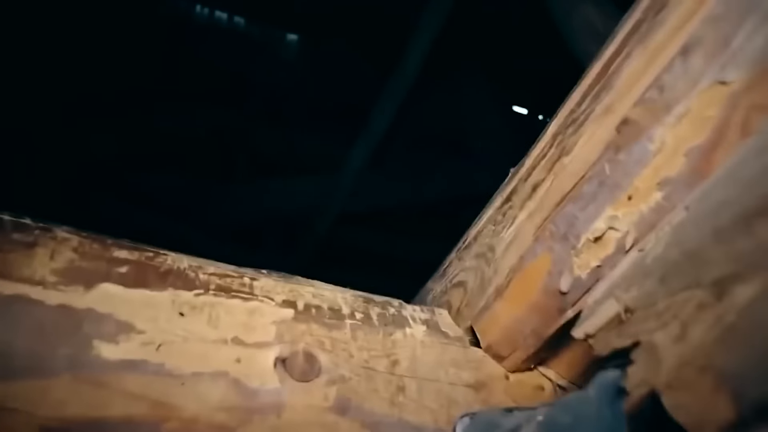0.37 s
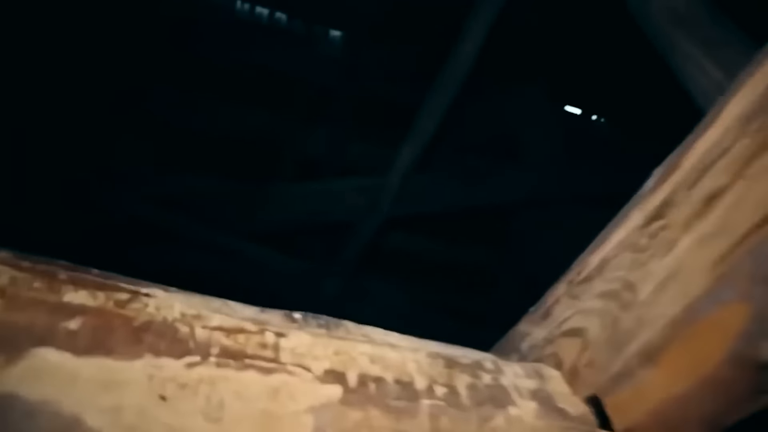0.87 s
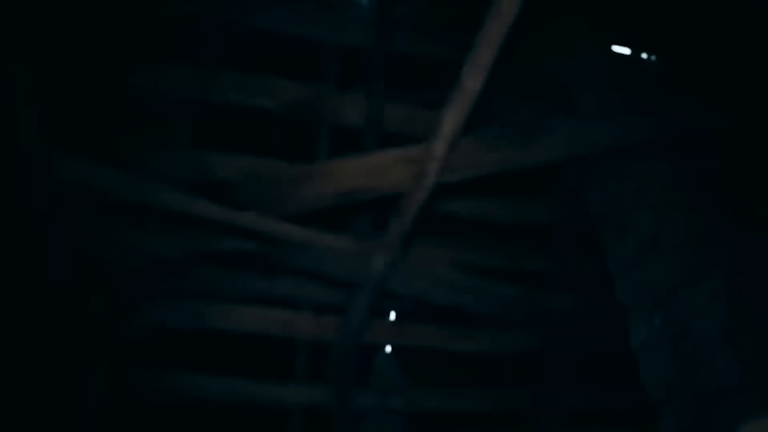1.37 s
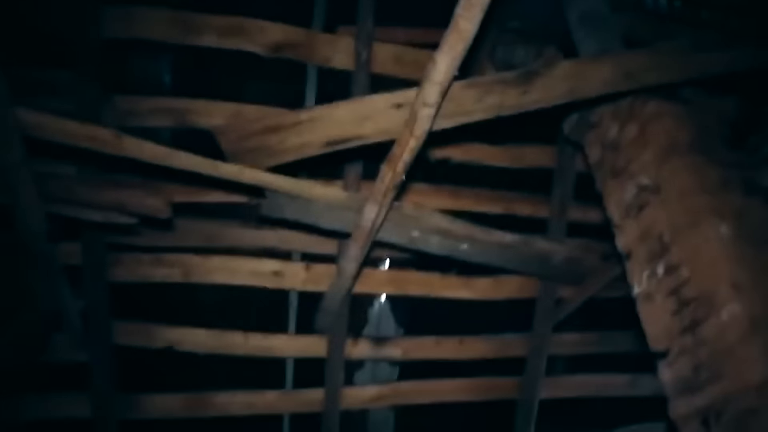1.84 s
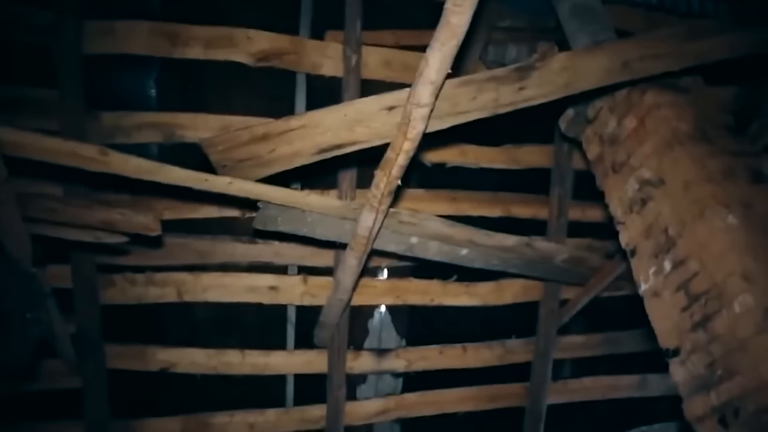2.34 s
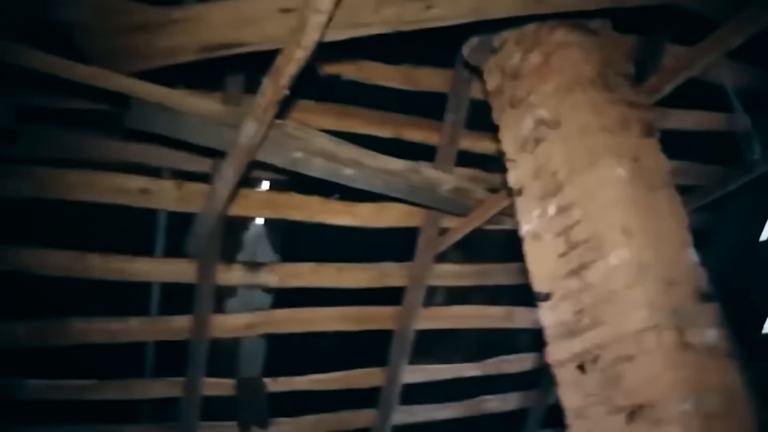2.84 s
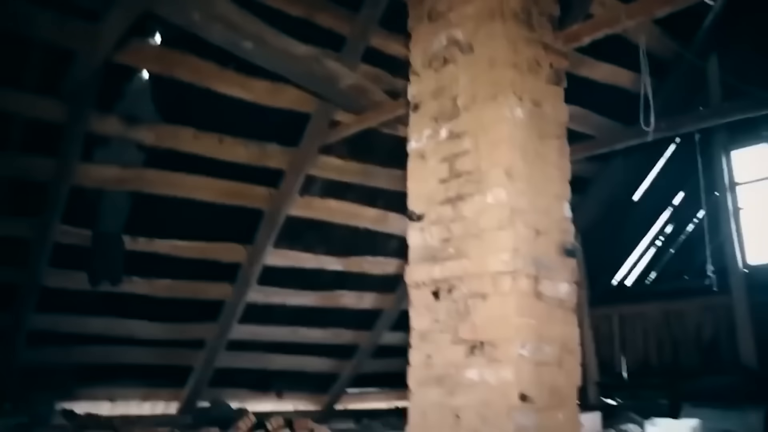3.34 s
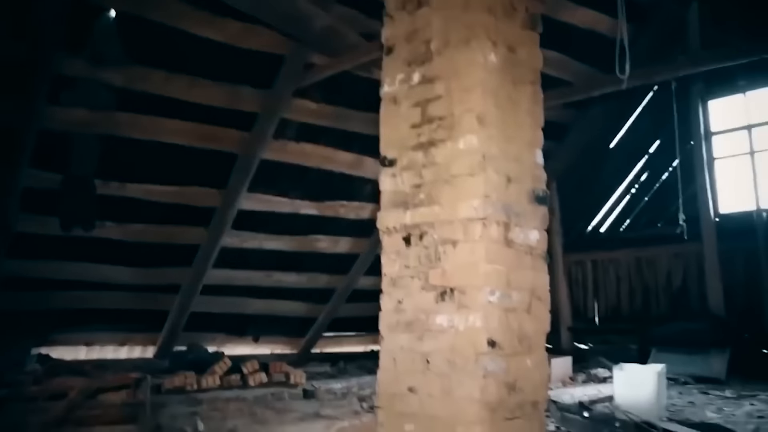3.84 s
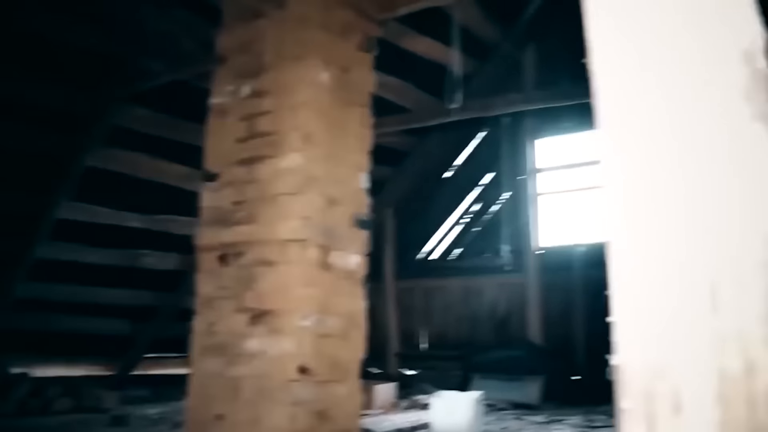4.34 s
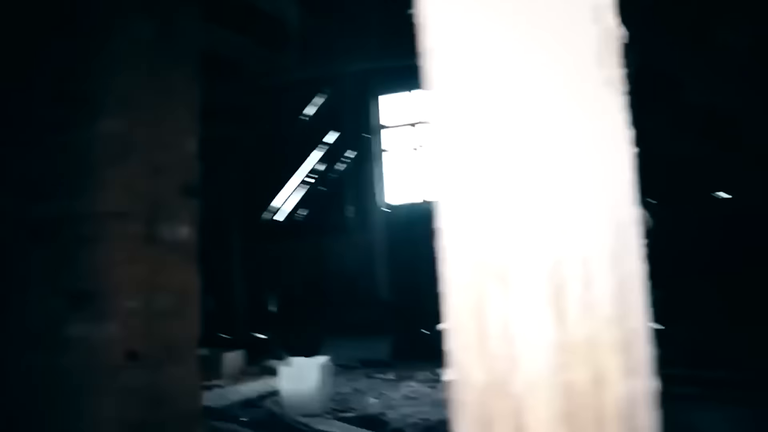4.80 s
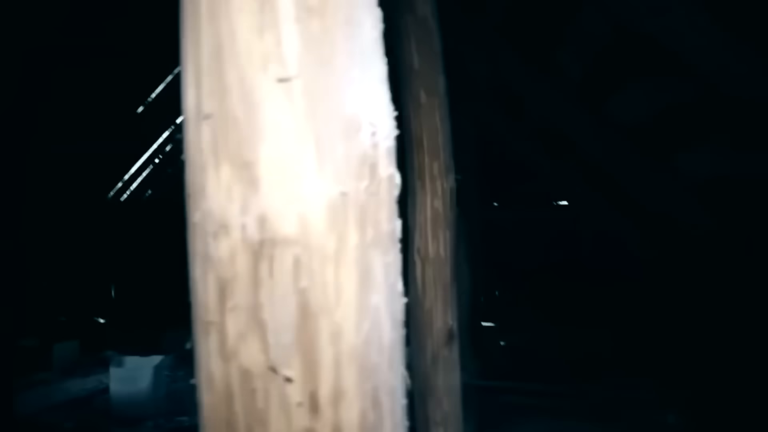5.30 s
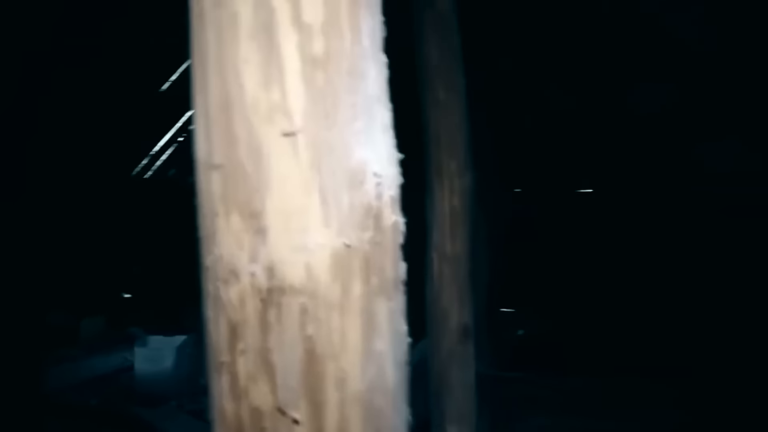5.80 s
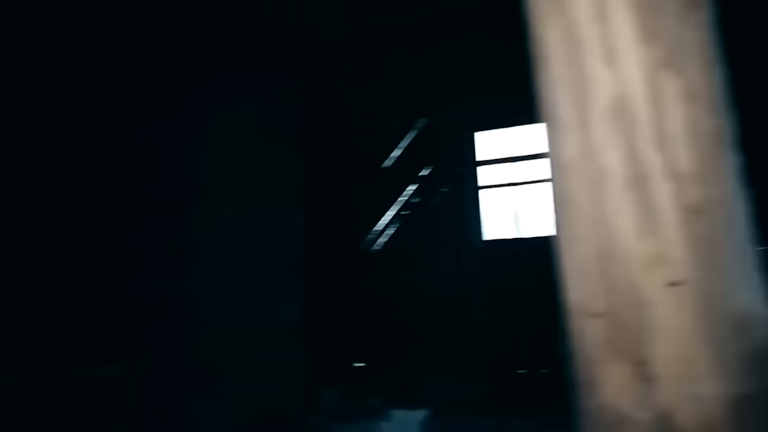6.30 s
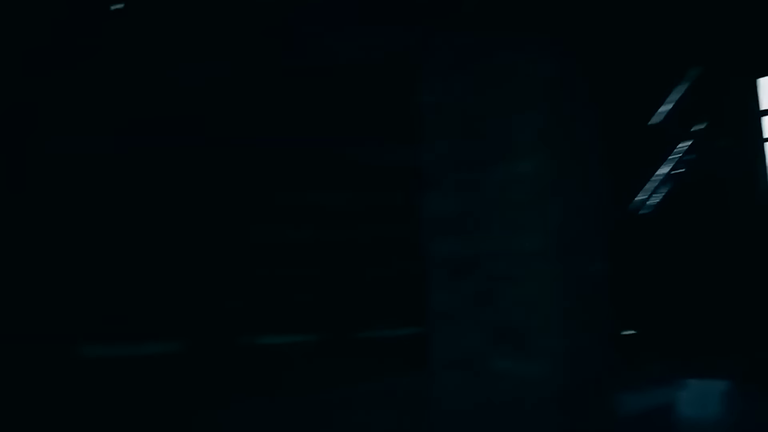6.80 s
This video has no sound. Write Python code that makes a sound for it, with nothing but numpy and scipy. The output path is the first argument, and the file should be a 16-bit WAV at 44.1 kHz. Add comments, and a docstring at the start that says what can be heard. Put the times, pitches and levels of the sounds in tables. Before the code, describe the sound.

Close stereo microphone carried by a walker in a dry wooden attic. Clothes rustle and bits of debris tick, then low hollow footsteps gather on loose boards, the loudest knock at about two seconds. A faint short shoe squeak follows, then sparse single steps, scuffs and tiny ticks. Finally a flurry of steps and rattling debris, with short roof echoes and faint hiss.

```python
"""A slow walk through a wooden attic, two-port microphone in hand: clothes rustle and debris ticks first.
Steps gather from 0.7 s as ringing boards over a booming floor beam; the loudest lands at 2.05 s.
A sole, a sliding narrow noise band, squeaks near 2.7 s; single steps follow, then scuffs (shaped noise)
and small ticks, and from 5.3 s a flurry of steps and debris. Boards murmur and grit crackles underfoot.
Throughout, a dry roof echoes the blows over faint noise of outdoor air and microphone hiss."""
import sys
import numpy as np
from scipy import signal
from scipy.fft import rfft, irfft
from scipy.io import wavfile
from scipy.ndimage import uniform_filter1d

SR = 44100
rng = np.random.default_rng(int(sys.argv[2]) if len(sys.argv) > 2 else 0)


def field_ratio(decibels):
    """Amplitude ratio for a level in dB (20 dB per decade); scalars and array-likes work."""
    return 10 ** (np.asarray(decibels, dtype=float) / 20)


def master(y):
    """Save y as 16-bit WAV."""
    cut = np.clip(np.atleast_2d(y).T, -1, 1)
    pcm = np.round(cut * 32767)  # scale
    wavfile.write(sys.argv[1], SR, pcm.astype(np.int16))


N = 305172
PORT_DELAY_S = 0.00013  # right port hears later


def evened(x):
    """Scales to rms 1."""
    return x / np.sqrt(np.mean(x ** 2) + 1e-20)


def read(points, hz):
    """Interpolates a curve on a log-frequency axis."""
    point_hz, value = np.transpose(points)
    return np.interp(np.log(hz + 1), np.log(point_hz + 1), value)


def add(mix, start_s, sound):
    """Mixes a sound in at start_s, cut at the end of the mix."""
    part = mix[..., round(start_s * SR):][..., :sound.shape[-1]]
    part += sound[..., :part.shape[-1]]


# Left-right likeness of the ports. Each row: frequency in Hz, correlation 0 to 1.
LIKENESS = [(30, 1), (60, 0.81), (125, 0.95), (250, 0.95), (500, 0.75), (1000, 0.66), (2000, 0.043),
            (16000, 0.033)]


def likeness(hz):
    """Long waves reach both ports alike, short ones differ."""
    return np.clip(read(LIKENESS, hz), -1, 1)


# Weight landing. Each row: listed time in seconds, board level in dB, board pitch in Hz,
# hardness (grit crack over board ring) in dB, beam boom over board level in dB.
STEPS = [(0.709, -25, 252, -24.5, -4), (0.87, -38.5, 197, -26, 3.5), (0.883, -30, 226, -34, 0),
         (1.196, -26.5, 202, -40, -14), (1.204, -27, 231, -51, 2.5), (1.218, -19.5, 212, -61, -18),
         (2.0546, -14, 319, -23, -9.5), (2.941, -40.5, 440, -14, -8), (3.7285, -27.5, 428, -21, -11.5),
         (5.309, -41.5, 425, -25, -13), (5.371, -29.5, 340, -33, -3), (5.39, -30, 334, -23, -7),
         (5.422, -35, 330, -11, -28), (5.439, -32.5, 257, -7.5, -4.5), (5.463, -41.5, 205, -25, 1),
         (5.895, -32, 390, -17, -8.5), (6.241, -18, 348, -34.5, -18), (6.85, -31, 350, -17, -13)]
# Debris and loose slats. Each row: listed time in seconds, level in dB, pitch in Hz,
# hardness (grit crack over ring) in dB, ring t60 in seconds.
DEBRIS = [(0.092, -40, 2100, -30, 0.02), (0.143, -33, 520, -28, 0.023), (0.233, -38, 580, -47, 0.025),
          (0.247, -41, 377, -29, 0.0077), (0.28, -39, 2120, -14, 0.032), (0.801, -45, 804, -20, 0.015),
          (1.035, -43.5, 1190, -14, 0.031), (1.064, -38.5, 493, -10.5, 0.031),
          (1.097, -36, 690, -42, 0.0089), (2.229, -42, 274, -33, 0.013), (2.53, -38, 583, -8, 0.046),
          (2.805, -43.5, 292, -21, 0.032), (3.236, -41, 444, -31, 0.015), (4.088, -48, 810, -26, 0.014),
          (4.254, -46.5, 282, -19, 0.036), (4.383, -54, 710, -9, 0.015), (4.627, -48, 619, -10, 0.014),
          (4.659, -44, 425, -3, 0.011), (4.948, -48, 940, -20, 0.036), (5.076, -45, 366, -15, 0.017),
          (5.121, -44, 953, -13.5, 0.034), (5.226, -39, 396, -15, 0.011), (5.289, -41.5, 385, -20, 0.043),
          (5.725, -42, 415, -12, 0.027), (5.819, -28.5, 440, -22, 0.0097), (6.065, -37.5, 470, -19, 0.038),
          (6.112, -34, 1020, -19, 0.01), (6.203, -37.5, 304, -13, 0.022), (6.255, -22.5, 299, -21, 0.014),
          (6.276, -53, 370, -8, 0.019), (6.295, -27, 362, -24, 0.0091), (6.311, -27, 457, -24, 0.01),
          (6.376, -31.5, 1010, -20, 0.02), (6.838, -31.5, 440, -22, 0.0083)]
# Floor beam modes. Each row: frequency in Hz, relative level in dB, t60 in seconds,
# swell time constant in seconds.
BEAM_MODES = [(107.3, -14.5, 0.22, 0.00075), (154.3, -14.5, 0.46, 0.017), (176.5, -11.5, 0.31, 0.0021),
              (231, 7, 0.17, 0.018), (282.5, -11, 0.25, 0.0027), (340.4, -7.5, 0.11, 0.0023),
              (407, -12.5, 0.15, .004)]
# Grit crack spectrum. Each row: frequency in Hz, relative level in dB per Hz.
CRACK_SPECTRUM = [(300, 9), (700, -17.5), (1300, 3), (2200, -2), (4000, -11.5), (8000, -32), (16000, -42)]
STEP_T60_S = 0.014  # a sole damps the board it lands on
LAG_S = 0.000982  # every blow sounds about 1 ms after its listed time


def beam_boom():
    """Damped floor beam modes, each swelling at its own speed; peak 1."""
    t = np.arange(SR // 2) / SR
    boom = np.zeros(len(t))
    for hz, db, t60, swell in BEAM_MODES:
        envelope = field_ratio(db - 60 * t / t60) * (1 - np.exp(-t / swell)) ** 3
        boom += envelope * np.sin(2 * np.pi * hz * t)
    return boom / abs(boom).max()


def grit_cracks(count):
    """Grit cracks all around the sole, so its treble differs at each port."""
    size = 4096
    t, hz = np.arange(size) / SR, np.fft.rfftfreq(size, 1 / SR)
    left, other = rfft(rng.standard_normal((count, 2, size))).transpose(1, 0, 2)
    same = likeness(hz)
    right = same * left + np.sqrt(1 - same ** 2) * other
    grit = irfft(np.stack([left, right], axis=1) * field_ratio(read(CRACK_SPECTRUM, hz)))
    return evened(grit) * (np.exp(-t / 0.026) + 2.1 * np.exp(-t / 0.00087))  # settling grit, snap


def knocks():
    """Steps strike boards and set the beam booming; debris only ticks."""
    beam = beam_boom()
    cracks = grit_cracks(len(STEPS) + len(DEBRIS))
    blows, boom = np.zeros((2, N)), np.zeros(N)
    for (s, db, hz, hard_db, boom_db), crack in zip(STEPS, cracks):
        add(blows, s + LAG_S, field_ratio(db) * blow(hz, STEP_T60_S, hard_db, crack))
        add(boom, s + LAG_S, field_ratio(db + boom_db) * beam)
    for (s, db, hz, hard_db, t60), crack in zip(DEBRIS, cracks[len(STEPS):]):
        add(blows, s + LAG_S, field_ratio(db) * blow(hz, t60, hard_db, crack))
    # a board is too small to radiate deep bass
    small = signal.butter(2, 140, "high", fs=SR, output="sos")
    return signal.sosfilt(small, blows), boom


# Overtones of a struck board. Each row: ratio to its pitch, relative level in dB,
# share of its ring time.
BOARD_MODES = [(1, 1, 0.93), (1.601, -3.5, 0.78), (2.7, -9.5, 0.56), (4.1, -20.5, 1)]


def blow(hz, t60, hard_db, crack):
    """A board rings briefly; a harder contact wakes its overtones and cracks the grit."""
    t = np.arange(crack.shape[-1]) / SR
    ring = np.zeros(len(t))
    for ratio, db, share in BOARD_MODES:
        bright_db = 0.31 * (hard_db + 24) * np.log2(ratio)
        decay_db = 60 * t / (share * max(t60, 0.004))
        ring += field_ratio(db + bright_db - decay_db) * np.sin(2 * np.pi * ratio * hz * t)
    ring *= (1 - np.exp(-t * hz / 0.51)) ** 2  # contact builds up over about one cycle
    return field_ratio(hard_db) * crack - ring / abs(ring).max()


# Shoes and cloth rubbing. Each row: full contact in seconds, length in seconds, level before tint in dB,
# hiss of cloth in dB, drag of the sole in dB.
SCUFFS = [(0.28, 0.0089, -44, -15, 5), (0.871, 0.056, -45, -7.5, 5.5), (1.082, 0.034, -53.5, -6, -3),
          (1.174, 0.067, -52.5, -7.5, 0), (1.882, 0.021, -49, -15, 2), (2.13, 0.037, -59.5, -3, 2),
          (2.24, 0.052, -53, -8.5, 8), (2.439, 0.035, -49.5, -6, -3), (2.532, 0.006, -44, -19, -13),
          (2.675, 0.048, -42.5, -6.5, -5), (2.786, 0.09, -50, -4, 0.5), (2.95, 0.0075, -39.5, -5.5, -1.5),
          (2.996, 0.16, -54.5, -3, -3.5), (3.922, 0.12, -55.5, -3.5, -2), (4.246, 0.067, -51, -4, 1.5),
          (4.635, 0.017, -39, -9, -5.5), (4.659, 0.036, -35, -5.5, 3), (4.721, 0.038, -37.5, -6.5, 3.5),
          (4.795, 0.053, -55, -9, 12.5), (5.428, 0.035, -37.5, -11, 2.5), (6.057, 0.08, -50.5, -8, -8),
          (6.244, 0.0075, -38.5, -6, 1.5), (6.285, 0.051, -44.5, -4, 3.5), (6.863, 0.065, -52.5, -1, 11.5)]
# The walker's body. Each row: time in seconds, rustle of moving clothes before tint in dB,
# weight shifting on the boards in dB.
MOTION = [(0.0, -51.5, -58), (0.3, -52, -55.5), (0.65, -57, -65.5), (0.89, -55.5, -48), (1.19, -56, -51),
          (1.45, -60, -56), (1.7, -50.5, -46), (1.86, -53.5, -54), (2.0, -65, -57.5), (2.3, -58.5, -53.5),
          (2.7, -51.5, -49.5), (2.97, -57.5, -55.5), (3.45, -60.5, -54), (3.7, -67.5, -57.5),
          (4.4, -64, -57.5), (5.0, -66, -59), (5.39, -61, -47.5), (5.64, -53.5, -54.5), (5.899, -48, -54),
          (6.2, -50.5, -49.5), (6.42, -56.5, -59), (6.65, -57.5, -56.5), (6.92, -64, -63)]
# Rubbing spectrum. Each row: frequency in Hz, relative level in dB per Hz.
SCUFF_SPECTRUM = [(100, -35), (250, -9.5), (500, -5.5), (1000, -8), (1800, -8.5), (2800, -8.5), (5000, -10),
                  (10000, -9.5), (15500, -11.5), (17000, -67)]
# Murmur of loaded boards. Each row: frequency in Hz, relative level in dB per Hz.
CREAK_SPECTRUM = [(18, -58), (30, -1), (76, 5.5), (150, 6), (257, 2.5), (548, -4.5), (1030, -8),
                  (1600, -12), (2500, -47), (3250, -90), (5500, -120)]
SCUFF_RISE_DB_PER_S, SCUFF_FALL_DB_PER_S = 1000, 328
RUSTLE_CLOTH_DB, RUSTLE_SOLE_DB = -8, 5


def shuffle():
    """Shoes and clothes scuff in the treble; shifting weight makes the boards murmur below."""
    t = np.arange(N) / SR
    s, rustle_db, load_db = np.transpose(MOTION)
    power = field_ratio(2 * np.interp(t, s, rustle_db))
    cloth, sole = power * RUSTLE_CLOTH_DB, power * RUSTLE_SOLE_DB
    for s0, length, db, cloth_db, sole_db in SCUFFS:  # tints average by power: the loudest sets the colour
        fade_db = np.maximum(SCUFF_RISE_DB_PER_S * (s0 - t), SCUFF_FALL_DB_PER_S * (t - s0 - length))
        stroke = field_ratio(2 * (db - np.maximum(fade_db, 0)))
        power = power + stroke
        cloth = cloth + stroke * cloth_db
        sole = sole + stroke * sole_db
    scuff = noise(SCUFF_SPECTRUM, patchy_db=1.5, grain_db=1.0,
                  cloth_db=cloth / power, sole_db=sole / power, size=256)
    creak = noise(CREAK_SPECTRUM, patchy_db=3.5, grain_db=1.5, size=1024)
    murmur = field_ratio(np.interp(t, s, load_db)) * creak
    return np.sqrt(power) * scuff + crackle(10 * np.log10(power)) + murmur


def crackle(scuff_db):
    """Bits of plaster and grit snap under a moving sole: sparse short ticks, a few large."""
    happens = rng.random(N) < 70 / SR  # 70 per second on average
    size = field_ratio(4.75 * np.minimum(rng.exponential(1, N), 3)) * happens
    kind, t, out = rng.integers(0, 10, N), np.arange(400) / SR, np.zeros(N)
    for k, hz in enumerate(np.geomspace(450, 3500, num=10)):
        tick = np.exp(-t * hz / 1.55) * np.sin(2 * np.pi * hz * t)
        out += signal.oaconvolve(size * (kind == k), tick)[:N]
    return field_ratio(0.73 * scuff_db - 17.5) * out * field_ratio([[-0.4], [0.4]])  # right slightly louder


SQUEAK_S, SQUEAK_LENGTH_S, SQUEAK_DB = 2.685, 0.05, -38.5
SQUEAK_START_HZ, SQUEAK_END_HZ, SQUEAK_WIDTH_HZ = 5990, 3830, 510


def squeak():
    """A sliding sole squeaks: noise in one narrow band that drops in pitch."""
    way = np.clip((np.arange(N) / SR - SQUEAK_S) / SQUEAK_LENGTH_S, 0, 1)
    pitch_hz = SQUEAK_START_HZ * (SQUEAK_END_HZ / SQUEAK_START_HZ) ** way
    carrier = np.exp(2j * np.pi * np.cumsum(pitch_hz) / SR)
    r = np.exp(-np.pi * SQUEAK_WIDTH_HZ / SR)
    hiss = rng.standard_normal((2, N)) + 1j * rng.standard_normal((2, N))
    fuzz = signal.lfilter([1 - r], [1, -r], hiss)
    return field_ratio(SQUEAK_DB) * np.sin(np.pi * way) * evened((carrier * fuzz).real)


# Roof decay. Each row: frequency in Hz, t60 in seconds.
ROOF_T60 = [(100, 0.93), (300, 0.23), (1000, 0.17), (3000, 0.095), (10000, 0.041)]


def roof(x):
    """Sparse echoes of random sign, each band dying at its own speed."""
    taps = np.zeros((2, SR // 2))
    slots = np.arange(200, SR // 2 - 20, 20)  # one echo per 20 samples
    at = slots + rng.integers(0, 20, (2, len(slots)))
    np.put_along_axis(taps, at, rng.choice([-1., 1.], at.shape), 1)
    hz, t, z = signal.stft(taps, SR, nperseg=512)
    same = likeness(hz)[:, None]
    z[1] = same * z[0] + np.sqrt(1 - same ** 2) * z[1]
    decay = field_ratio(-60 * t / read(ROOF_T60, hz)[:, None])
    tail = signal.istft(z * decay, SR, nperseg=512)[1]
    return signal.fftconvolve(x[None], tail / np.linalg.norm(tail[0]), axes=1)[:, :N]


# Outdoor air and microphone hiss. Each row: frequency in Hz, relative level in dB per Hz.
AIR_SPECTRUM = [(25, 2.5), (100, -9.5), (360, -7), (900, -12.5), (2500, -16), (9500, -25.5), (15500, -25.5),
                (17000, -68)]
AIR_DB = -59.5


def air():
    """Outdoor air and microphone hiss: steady, faint shaped noise."""
    return field_ratio(AIR_DB) * noise(AIR_SPECTRUM, patchy_db=-0.6, grain_db=0.9, size=1024)


def noise(spectrum, patchy_db, grain_db, cloth_db=0, sole_db=0, size=512):
    """Two-port noise with time-frequency patches; grains make its loudness jump from moment to moment."""
    hop = size // 4
    frames, hz = N // hop + 5, np.fft.rfftfreq(size, 1 / SR)
    a, b, c, d, patches = rng.standard_normal((frames, len(hz), 5)).T
    patches = uniform_filter1d(patches, size=6, axis=0)
    patches = evened(uniform_filter1d(patches, size=12, axis=1))
    at = np.arange(frames) * hop
    cloth, sole = (np.interp(at, np.arange(N), v * np.ones(N)) for v in (cloth_db, sole_db))
    high = np.clip(np.log2(hz / 5600 + 0.0013) / 0.64, 0, 1)[:, None]  # cloth hisses above 5.6 kHz
    low = np.clip(np.log2(3600 / (hz + 1)) / 1.12, 0, 1)[:, None]  # the sole drags below 3.6 kHz
    same, left, other = likeness(hz)[:, None], a + 1j * b, c + 1j * d
    delay = np.exp(-2j * np.pi * hz * PORT_DELAY_S)[:, None]
    right = same * left * delay + np.sqrt(1 - same ** 2) * other
    field = field_ratio(read(spectrum, hz)[:, None] + patchy_db * patches)
    plain = np.sqrt(2 * (field ** 2).mean())  # level without the tint
    z = np.array([left, right]) * field * field_ratio(cloth * high + sole * low) / plain
    x = signal.istft(z, nperseg=size, noverlap=size - hop)[1][:, :N] / np.sqrt(3 * size / 16)
    grain = evened(uniform_filter1d(rng.standard_normal(N), size=90))
    return x * evened(field_ratio(grain_db * grain))


ROOF_DB = -7


def scene():
    """Blows reach the left port a little first; the roof throws back their sharp part."""
    blows, boom = knocks()
    n = np.arange(N)
    late = np.interp(n - PORT_DELAY_S * SR, n, blows[1] + boom)
    direct = np.array([field_ratio(2.5) * (blows[0] + boom), field_ratio(3.0) * late])
    sharp = signal.sosfilt(signal.butter(2, 520, "high", fs=SR, output="sos"), blows[0])
    return direct + field_ratio(ROOF_DB) * roof(sharp) + shuffle() + squeak() + air()


def low_pass(x):
    """Removes everything above the highest recorded frequency."""
    return signal.sosfilt(signal.butter(12, 16330, fs=SR, output="sos"), x)


def record(dry):
    """The microphone's 45 Hz low cut thins the deep bass."""
    low_cut = signal.butter(2, 45, "high", fs=SR, output="sos")
    mix = signal.sosfilt(low_cut, dry)
    return low_pass(mix)


dry = scene()
out = record(dry)
master(out)
```